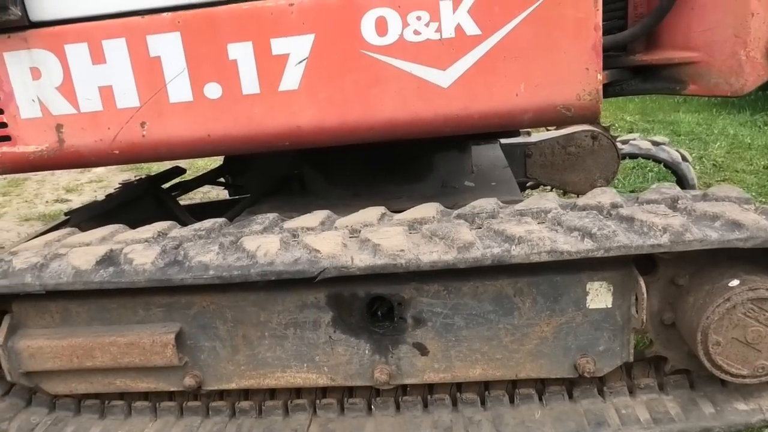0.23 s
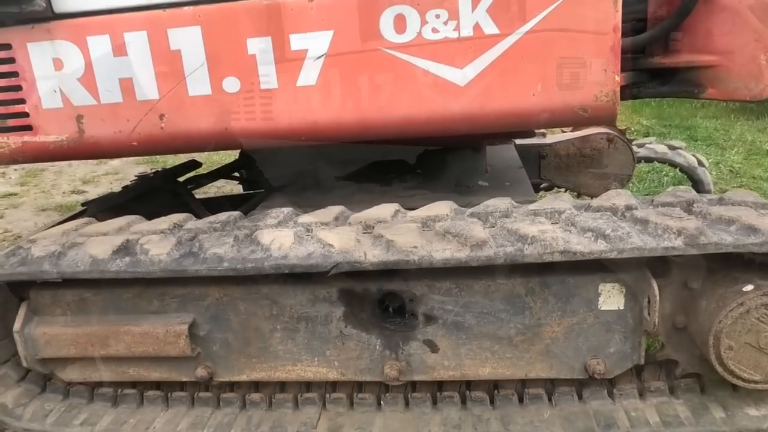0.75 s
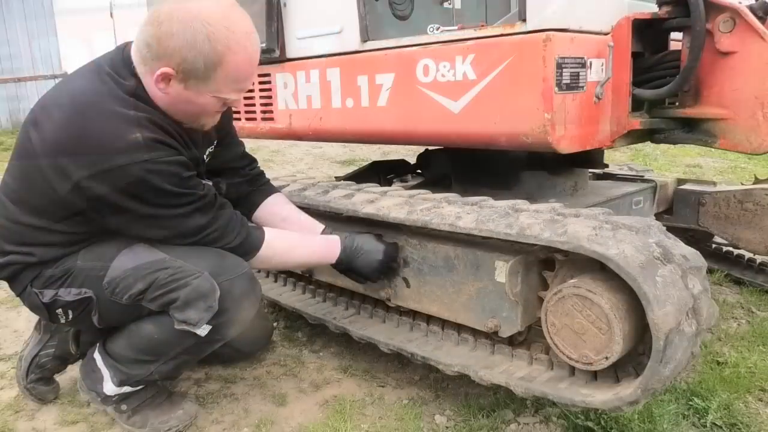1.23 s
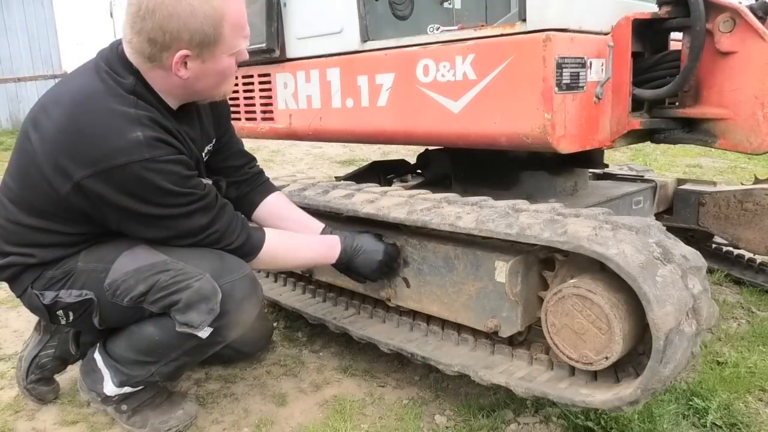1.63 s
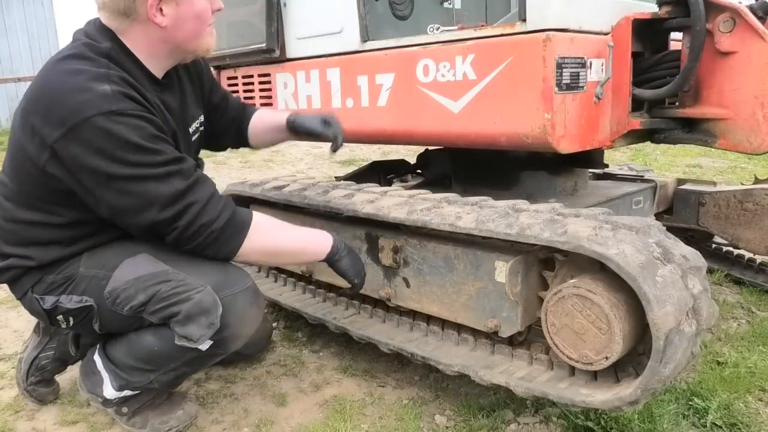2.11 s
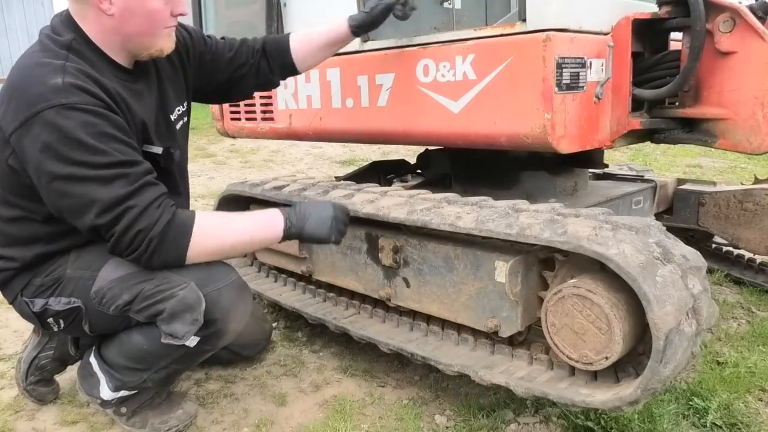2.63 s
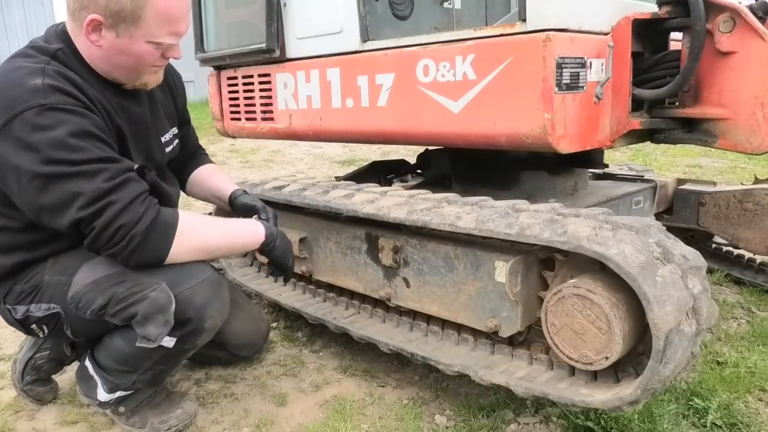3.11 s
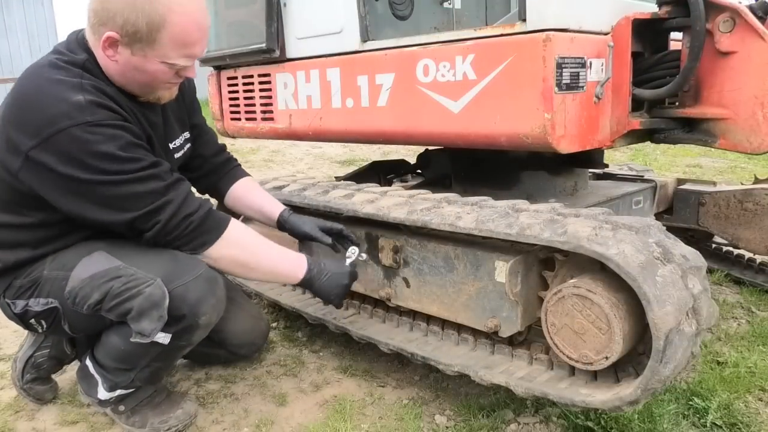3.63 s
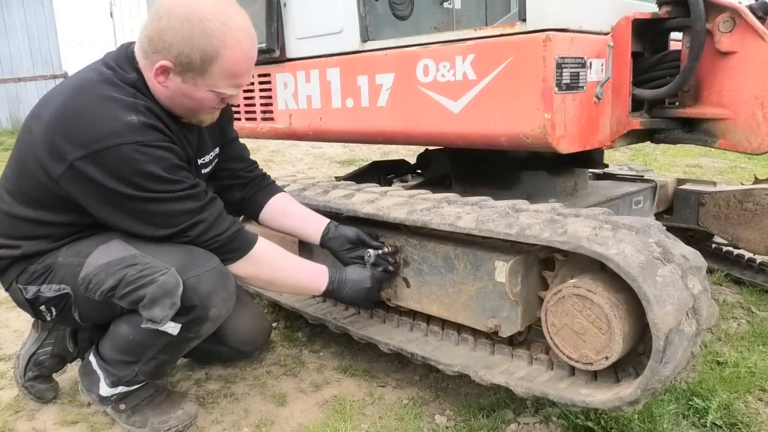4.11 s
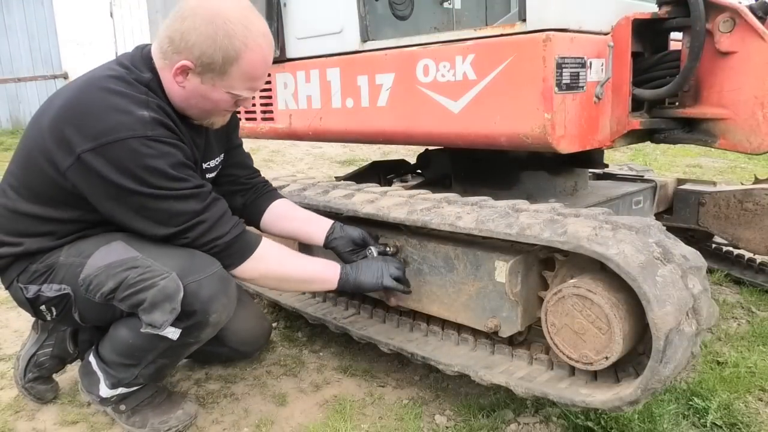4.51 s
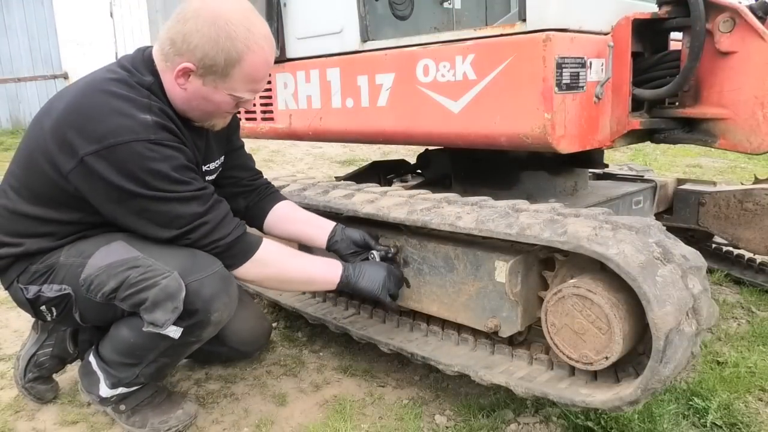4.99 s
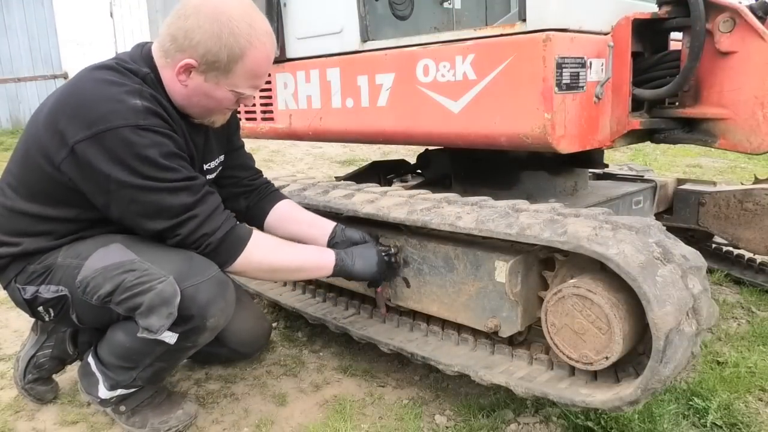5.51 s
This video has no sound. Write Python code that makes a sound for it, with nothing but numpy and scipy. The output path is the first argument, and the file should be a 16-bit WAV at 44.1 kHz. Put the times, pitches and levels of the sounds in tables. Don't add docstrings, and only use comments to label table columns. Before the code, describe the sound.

Clattering diesel idle dissolves into hissy outdoor quiet, where hands rub and tick on steel, a bird whistles, and a tool snaps hard.

```python
import sys
import numpy as np
from scipy import signal
from scipy.fft import rfft, irfft
from scipy.io import wavfile
from scipy.ndimage import uniform_filter1d

SR = 44100
rng = np.random.default_rng(int(sys.argv[2]) if len(sys.argv) > 2 else 0)


def master(y):
    cut = np.clip(np.atleast_2d(y).T, -1, 1)
    pcm = np.round(cut * 32767)
    wavfile.write(sys.argv[1], SR, pcm.astype(np.int16))


def magnitude_from_level(level_db):
    exponent = np.asarray(level_db, float) / 20
    return 10 ** exponent


N = 253575

FIRING_HZ = 36.99
CYLINDER_DB = [-.6, 1.4, 1.2]


def rms_one(x):
    return x / np.sqrt(np.mean(x ** 2) + 1e-20)


def in_time(rows):
    s, *columns = np.transpose(rows)
    return [np.interp(np.arange(N) / SR, s, c) for c in columns]


def coloured(spectrum):
    hz, level_db = np.transpose(spectrum)
    bins = np.arange(1, N // 2 + 2) * SR / N
    gain = magnitude_from_level(np.interp(np.log(bins), np.log(hz), level_db))
    return rms_one(irfft(rfft(rng.standard_normal(N)) * gain, N))


def band(x, low_hz, high_hz):
    return signal.sosfilt(signal.butter(2, [low_hz, min(high_hz, .45 * SR)], "band", fs=SR, output="sos"), x)


def resonance(x, hz, width_hz):
    r = np.exp(-np.pi * width_hz / SR)
    poles = [1, -2 * r * np.cos(2 * np.pi * hz / SR), r * r]
    return signal.lfilter([(1 - r * r) / 2, 0, (r * r - 1) / 2], poles, x)


def drift(rate_hz):
    count = int(N / SR * rate_hz) + 2
    return np.interp(np.linspace(0, count - 1, N), np.arange(count), rng.standard_normal(count))


def add(out, s, sound):
    i = max(round(s * SR), 0)
    out[i:i + len(sound)] += sound[:N - i]


def add_peak(out, s, db, sound):
    add(out, s, magnitude_from_level(db) * sound / np.abs(sound).max())


def puff(noise, t60, build_up_s=0.00012):
    t = np.arange(len(noise)) / SR
    return noise * magnitude_from_level(-60 * t / t60) * (1 - np.exp(-t / build_up_s)) ** 2


def struck(modes, luck, contact_s=.0015):
    t, ring = np.arange(9000) / SR, 0
    for (hz, db, t60), u in zip(modes, luck):
        ring = ring + magnitude_from_level(db + 1.2 * u - 60 * t / t60) * np.sin(2 * np.pi * hz * t)
    ring = ring * (1 - np.exp(-t / contact_s))
    return ring / np.abs(ring).max()


def far_hum():
    # pitch_hz, width_hz, level_db, change_db_per_s
    hum_peaks = [
        (77, 10, -84.5, -1),
        (149, 9, -80.5, -2),
        (945, 300, -90, 2),
    ]
    white, t = rng.standard_normal(N), np.arange(N) / SR - 1.5
    out = np.zeros(N)
    for hz, width_hz, db, slope_db in hum_peaks:
        tone = resonance(resonance(white, hz, width_hz), hz, width_hz)
        out += magnitude_from_level(db + slope_db * t) * rms_one(tone)
    return out


def yard_air():
    # freq_hz, level_db_per_hz
    air_colour = [(8.8, -28.5), (15, 7.5), (31, -3.5), (65, -7.5), (150, -10), (371, -19.5), (512, -19.5),
                  (748, -21.5), (1000, -19), (1600, -24), (7490, -28.5), (14700, -24), (16000, -22.5)]
    sway = uniform_filter1d(drift(21.0), size=2000)
    return magnitude_from_level(-70) * coloured(air_colour) + far_hum() + magnitude_from_level(-65.5) * sway


def bird():
    # start_s, whistles_db, closing_note_after_s, closing_start_hz, closing_db
    phrases = [
        (2.623, -62, .096, 2480, -72),
        (2.775, -66, 0.1, 2600, -70),
        (2.925, -73, .104, 2700, -68),
        (3.084, -81, .105, 3260, -66),
        (3.255, -83.5, 0.1, 3000, -72),
    ]
    # delay_s, length_s, start_hz, end_hz, level_db
    whistles = [
        (0, 0.0096, 4480, 6140, 2.5),
        (.007, .008, 4660, 5940, -1),
        (.033, 0.0063, 5900, 4000, -2),
        (0.037, 0.0093, 5600, 4300, -9),
        (.052, .048, 4050, 4600, -13),
    ]
    closing_s, closing_hz, trill_depth, trill_hz = 0.0207, 3600, 0.5, 190
    out = np.zeros(N)
    for s, whistle_db, gap, from_hz, closing_db in phrases:
        notes = [(s + delay, length, a_hz, b_hz, whistle_db + db) for delay, length, a_hz, b_hz, db in whistles]
        notes.append((s + gap, closing_s, from_hz, closing_hz, closing_db))
        for start, length, start_hz, end_hz, db in notes:
            count = int(length * SR)
            along = np.arange(count) / count
            bend = along ** (.8 if length == closing_s else 1.3)
            glide = np.cumsum(start_hz + (end_hz - start_hz) * bend) / SR
            throat = 1 + trill_depth * (length > .012) * np.cos(2 * np.pi * trill_hz * np.arange(count) / SR)
            shape = np.sin(np.pi * along ** 1.1) ** 2
            add(out, start, magnitude_from_level(db) * shape * throat * np.sin(2 * np.pi * glide))
    return out


def rustle():
    # time_s, effort_db
    effort_curve = [(1.5, 0), (1.82, 1), (2.11, 1), (2.28, 3.5), (2.45, 0.5), (2.7, -5), (3.12, 0.5),
                    (3.45, -2.5), (3.62, 4), (3.8, 1), (4.08, -2), (4.3, -5), (4.49, -0.5), (4.84, -2.5),
                    (5.17, -2.5), (5.32, -3.5), (5.5, -1), (5.75, -2)]
    rub_db, crisp_db, brush_db = -69.5, -71.5, -78.5
    grains = rng.standard_normal((3, N)) * magnitude_from_level(1.4 * np.minimum(rng.exponential(1, (3, N)), 5))
    effort_db, = in_time(effort_curve)
    rub = magnitude_from_level(rub_db + effort_db + 1.2 * drift(45.)) * rms_one(band(grains[0], 2200, 11000))
    crisp = magnitude_from_level(crisp_db + .99 * effort_db + 1.201 * drift(45.)) * rms_one(band(grains[1], 8700, 21000))
    brush = magnitude_from_level(brush_db + effort_db) * rms_one(band(grains[2], 250, 2600))
    return rub + crisp + brush


def strokes():
    # start_s, length_s, low_hz, high_hz,
    # level_db
    drags = [(1.33, .16, 3770, 7900, -60), (1.35, 0.11, 7860, 11500, -58), (1.375, .035, 8500, 11200, -58),
             (1.37, .1, 1580, 1760, -76), (1.385, 0.07, 4150, 4400, -68), (1.585, .04, 5510, 8950, -68),
             (2.14, 0.069, 1500, 4550, -73.5), (2.545, 0.07, 89, 600, -71),
             (3.395, .12, 6800, 11500, -63.5), (3.42, 0.1, 3930, 7000, -66.5),
             (3.485, .035, 4300, 5900, -67), (3.453, .02, 250, 1000, -73), (3.312, 0.02, 5500, 9000, -67.5),
             (3.444, 0.09, 199, 1207, -73.5), (3.463, 0.1, 60.7, 94, -72.5), (3.715, 0.12, 2490, 8960, -72),
             (4.04, .02, 1950, 2250, -69), (4.005, .008, 1100, 1500, -69), (4.125, 0.024, 3400, 5600, -78),
             (4.288, 0.038, 2200, 4200, -75), (4.465, 0.06, 1800, 2700, -77),
             (4.645, .045, 1390, 3200, -73), (4.995, 0.038, 1500, 3400, -74.5),
             (4.232, 0.059, 5960, 9840, -69), (4.549, .067, 2000, 8950, -68.5),
             (5.132, 0.011, 1500, 6500, -59), (5.172, .04, 7000, 10500, -70), (5.645, .04, 860, 980, -76),
             (5.635, .03, 450, 530, -79), (5.45, .03, 800, 960, -76), (5.17, 0.11, 300, 2600, -79),
             (5.22, 0.16, 450, 1400, -77), (5.168, .03, 49.7, 300, -65), (5.43, .075, 1000, 8100, -68),
             (5.63, 0.06, 1990, 7950, -70.5)]
    # start_s, length_s, low_hz, level_db
    wipes = [(1.438, .016, 9000, -62.5), (1.796, .035, 4000, -65), (2.021, 0.036, 5000, -65),
             (2.302, 0.13, 2920, -67), (2.511, .025, 3000, -67), (2.555, 0.035, 3000, -61.5),
             (2.59, 0.042, 8000, -72), (2.75, 0.061, 5000, -66.5), (3.093, 0.052, 4000, -65.5),
             (3.138, 0.11, 4000, -67.5), (3.224, 0.024, 5760, -57.5), (3.37, 0.049, 3870, -64),
             (3.43, .03, 7500, -63), (3.567, .17, 2500, -70), (3.666, 0.031, 5880, -64),
             (4.287, 0.036, 5000, -62), (4.412, 0.017, 3980, -69.5), (4.454, 0.013, 6000, -65),
             (4.512, .016, 5000, -66.5), (4.614, 0.046, 3850, -67.5), (4.918, 0.04, 3520, -64),
             (5.075, 0.021, 3000, -68), (5.627, 0.012, 1500, -63), (5.722, 0.018, 3444, -64)]
    wipe_top_hz = 16030
    rows = [(s, length, hz, wipe_top_hz, db) for s, length, hz, db in wipes] + list(drags)
    out, luck = np.zeros(N), rng.standard_normal((len(rows), 2, 8000))
    for (s, length, low_hz, high_hz, db), (white, grain) in zip(rows, luck):
        count = int(length * SR)
        along = np.arange(count) / count
        roughness = magnitude_from_level(22 * uniform_filter1d(grain, size=90)[:count])
        pressure = np.sin(np.pi * along ** 1.2) ** .8 * roughness
        friction = rms_one(band(band(white, low_hz, high_hz), 0.7 * low_hz, 1.2 * high_hz))
        add(out, s, magnitude_from_level(db) * pressure * friction[:count])
    return out


def ticks():
    # start_s, peak_db, centre_hz, broad_spike_db
    tick_events = [(1.4693, -53, 7000, 5), (1.6244, -57, 11000, -1), (2.576, -52, 7000, -6),
                   (2.591, -49.5, 5800, -2), (2.7924, -53, 7340, -5), (2.9764, -55, 12400, -3.5),
                   (2.9938, -53, 3100, 0), (2.9942, -57, 8200, -6), (3.0, -57, 7900, -12),
                   (3.0328, -55, 7800, 8), (3.051, -60, 9000, -3), (3.0839, -53, 7990, -2),
                   (3.1068, -49.5, 10500, 5), (3.1114, -50, 9000, -3), (3.086, -56, 11500, -6),
                   (3.1255, -54, 9000, -3), (3.1754, -55, 7660, -3), (3.213, -50, 7630, -9.5),
                   (3.2864, -56, 5320, -3), (3.0712, -58, 12600, -12), (3.2656, -59, 7300, -12),
                   (3.3597, -57, 6770, -14), (3.3864, -58, 5800, 2), (3.4205, -47.5, 9300, 4),
                   (3.4503, -45.5, 8750, 3), (3.4506, -48, 5600, -10), (4.0708, -58, 4180, -6),
                   (4.287, -54, 6300, -17), (4.2932, -52, 6200, -9.5), (4.348, -54.5, 5230, -6),
                   (4.349, -59.5, 3500, -9), (4.4994, -57.5, 3820, -4), (4.7446, -56, 13360, 6),
                   (4.8667, -51, 7500, -7), (5.118, -52, 12910, -3), (5.1338, -50, 3500, -2),
                   (5.548, -65.5, 5500, -9), (5.573, -65, 3100, -9), (5.608, -61, 4600, -8.5),
                   (5.628, -54, 6500, 2)]
    out, noise = np.zeros(N), rng.standard_normal((len(tick_events), 2000))
    spike = band(np.arange(200) == 8, 3100, 16500)
    for (s, db, hz, spike_db), white in zip(tick_events, noise):
        add_peak(out, s, db, resonance(puff(white, .012), hz, 0.32 * hz))
        add_peak(out, s, db + spike_db, spike)
    return out


def knocks(blows, modes):
    out, luck = np.zeros(N), rng.standard_normal((len(blows), 9000))
    for (s, db, crack_db, rumble_db), row in zip(blows, luck):
        add(out, s, magnitude_from_level(db) * struck(modes, row, contact_s=.0005))
        add(out, s, magnitude_from_level(db + crack_db) * puff(band(row, 1550, 8000), 0.031))
        rumble = rms_one(band(row[::-1], 170, 1050))
        add(out, s, magnitude_from_level(db + rumble_db) * puff(rumble, 0.1573, 0.012))
    return out


def body_blows():
    # start_s, peak_db, crack_db, dull_rumble_db
    ledge_knocks = [
        (2.5238, -43, -10, -32),
        (2.529, -41, -14, -21),
        (2.547, -58, -10, -14),
        (2.5765, -60, -4, -8),
    ]
    frame_knocks = [
        (4.0165, -39.5, 2, -19.5),
        (4.033, -58, -2, -20),
    ]
    track_thuds = [
        (4.018, -58, -38.5, -17),
        (4.25, -65, -37, -11),
        (5.1772, -44, -31, -18),
        (5.229, -58, -37, -2),
        (5.63, -71, -40, -4),
    ]
    # pitch_hz, level_db, t60_s
    ledge_modes = [(138, -19, 0.16), (400, -18, 0.1), (450, -12, 0.2), (1237, -11, 0.11), (2040, -6, 0.056),
                   (2100, -10, 0.044), (2330, -5, 0.06), (2400, 0, 0.1), (2600, -9, .05), (2780, -7, .03),
                   (3180, -7, 0.066), (3560, -3, 0.07), (3440, -9, .055), (4150, -21, 0.08),
                   (4870, -18, .03)]
    frame_modes = [(1500, -31, 0.037), (1620, 2, 0.033), (1685, -2, 0.04), (1840, -3, 0.044),
                   (1970, -11, .05), (2130, -5, 0.085), (2060, -9, .09), (2400, 1, 0.049),
                   (2250, -3.5, 0.074), (2500, 9.5, 0.026), (2980, -8.5, 0.057), (3270, -17, 0.018),
                   (3660, 6, 0.013), (4320, -5, 0.035)]
    track_modes = [(149, 2, 0.042), (494, 1, 0.069), (600, 16.5, 0.025), (926, 11, 0.022), (1320, 9, 0.016)]
    return knocks(ledge_knocks, ledge_modes) + knocks(frame_knocks, frame_modes) + knocks(track_thuds, track_modes)


def snaps():
    # start_s, peak_db, centre_hz, fitting_ring_db, t60_s
    slips = [(4.0191, -40, 12800, -42, 0.012), (5.1419, -36, 9000, -32, .01),
             (5.1432, -29.5, 8800, -35, .015), (5.153, -30, 8500, -35, .014), (5.164, -36, 8350, -30, .008),
             (5.1648, -28, 8350, -19, .016), (5.1696, -26, 8000, -16.5, 0.022),
             (5.2187, -36, 6950, -35, 0.003), (5.2206, -30, 8800, -26, 0.014),
             (5.4265, -38.5, 8940, -37.5, 0.0079), (5.4298, -32, 7020, -29, .016),
             (5.581, -42, 7990, -30, .016), (5.5838, -36, 7000, -30, 0.02), (5.6275, -59, 5700, -5, .008)]
    # centre_hz, width_hz, level_db
    spanner_colour = [(11000, 8600, -7), (5000, 2100, -7.5), (14950, 2100, -11)]
    # pitch_hz, level_db, t60_s
    fitting_modes = [(1634, 11, 0.032), (1737, 8, 0.052), (2380, 2, 0.05), (1980, 5, 0.033),
                     (2530, 6.5, 0.041), (3000, 9.5, 0.012)]
    # start_s, peak_db
    jaw_clicks = [
        (4.0199, -36),
        (5.143, -19.5),
        (5.1646, -25),
        (5.1696, -32),
        (5.2207, -34),
        (5.431, -34),
        (5.585, -35),
    ]
    out, luck = np.zeros(N), rng.standard_normal((len(slips), 3000))
    for (s, db, hz, ring_db, t60), white in zip(slips, luck):
        burst = puff(white, t60, 0.00036)
        snap = 2 * resonance(burst, hz, 800)
        for centre_hz, width_hz, gain_db in spanner_colour:
            snap = snap + magnitude_from_level(gain_db) * resonance(burst, centre_hz, width_hz)
        snap = signal.sosfilt(signal.butter(2, 0.84 * hz, "high", fs=SR, output="sos"), snap)
        add_peak(out, s, db, snap)
        add(out, s + 0.0025, magnitude_from_level(db + ring_db) * struck(fitting_modes, white[-len(fitting_modes):]))
    click = band(np.arange(200) == 8, 9000, 16000)
    for s, db in jaw_clicks:
        add_peak(out, s, db, click)
    return out


def wavering(turn, db, wander, blur=1):
    phase = wander * drift(11.0) + blur * rng.uniform(-np.pi, np.pi)
    return magnitude_from_level(db + 2.2 * drift(9.6)) * np.sin(turn + phase)


def cycle_whine():
    # pitch_hz, level_db
    cycle_tones = [(641, -27), (776, -24), (974.2, -19), (1195.5, -33), (1319, -29), (1738.5, -29),
                   (1960, -33), (2109.5, -25.5), (3095, -32.5)]
    turn = 2 * np.pi * np.arange(N) / SR
    return sum(wavering(hz * turn, db, .7) for hz, db in cycle_tones) * np.sqrt(2)


def looseness(order, db):
    # into_cycle_s, first_order, last_order, blur (1 = no swell)
    swell_groups = [(.009, 8, 18, .6), (.046, 21, 30, .3), (.039, 36, 45, .4)]
    steady_wander, loose_wander, loose_below_db = .5, 1.5, -9.2
    if order < 7:
        return 0, steady_wander / 2, 1
    wander = loose_wander if db < loose_below_db else steady_wander
    for s, first, last, blur in swell_groups:
        if first <= order <= last:
            return s, wander, blur
    return 0, wander, 1


def exhaust():
    # multiple_of_cycle, level_db
    orders = [(3, -11), (5, -18), (6, -5), (8, -8), (9, -5.5), (10, -5.5), (11, -14), (12, -2.5),
              (13, -9.5), (14, -9), (15, -12), (16, -12), (17, -4), (18, -8), (21, -2.5), (22, -9),
              (23, -5.5), (24, -6), (25, -8.5), (26, 0.5), (27, -10), (28, -12), (29, -4), (30, -4),
              (31, -13), (34, -15), (36, -14), (37, -11), (38, -13), (39, -4.5), (40, -12), (42, -9),
              (43, -13), (44, -11), (45, -13), (47, -14)]
    out, cycle_hz = 0, FIRING_HZ / len(CYLINDER_DB)
    for order, db in orders:
        s, wander, blur = looseness(order, db)
        turn = 2 * np.pi * order * cycle_hz * (np.arange(N) / SR - s)
        out = out + wavering(turn, db, wander, blur)
    return rms_one(out)


def combustion_knock(firings):
    # pitch_hz, level_db, t60_s
    block_modes = [(1330, -2, .02), (1740, 4, .028), (1930, 6.5, .027), (2450, -4, .025), (3090, -5, .025),
                   (3480, -2, .06), (3950, -5, .02), (6000, -14, .008)]
    strike_place = [(3, 3, -8, -6, -6, -2, -6, -8), (-4, -6, 2, 3, 4, 0, -2, 2),
                    (-4, -2, 1, -5, -6, 1, 4, 1)]
    knock_db, delay_s = -6, (0.0032, .002, .0022)
    scatter, jitter_s = 2.2, .00005
    out, luck = np.zeros(N), rng.standard_normal((len(firings), len(block_modes) + 1))
    for k, (s, row) in enumerate(zip(firings, luck)):
        cylinder = k % len(CYLINDER_DB)
        modes = [(hz, db + extra_db, t60) for (hz, db, t60), extra_db in zip(block_modes, strike_place[cylinder])]
        start = s + delay_s[cylinder] + jitter_s * row[-1]
        add(out, start, magnitude_from_level(knock_db + CYLINDER_DB[cylinder]) * struck(modes, scatter * row))
    return out


def swell(times, sizes, hold, fall):
    out, t = np.zeros(N), np.arange(3000) / SR
    shape = (1 - np.exp(-t / 0.00052)) * np.exp(-np.maximum(t - hold, 0) / fall)
    for s, size in zip(times, sizes):
        add(out, s, size * shape)
    return out


def firing_clatter(firings):
    # freq_hz, level_db_per_hz
    roar_colour = [(29, -47), (50, -7), (145, -4), (234, -8.5), (321, -4), (398, -8.5), (472, -6.5),
                   (678, -8.5), (997, -10.5), (1540, -16), (1780, -12.5), (2620, -21), (3500, -20.5),
                   (8340, -34), (16000, -54)]
    # low_hz, high_hz, delay_s, hold_s, fall_s, burst_db, valve_tick_db, share_repeated_every_cycle (0-1)
    clatter_bands = [(90, 250, .004, .004, .004, -20, -20, .1), (250, 400, .004, .004, .004, -20, -20, .25),
                     (400, 600, .005, .004, .003, -4, -20, .15), (600, 1000, .004, .004, .004, -8, -12, .6),
                     (1000, 1600, .003, .0045, .001, 2, -10, .85),
                     (1600, 2500, .0022, .004, .003, 8.5, -3, .7),
                     (2500, 4400, .0012, .0095, .0065, 12.5, -1, .55),
                     (4400, 7500, -.0006, .003, .01, 7, 2, .25),
                     (7500, 17000, .0008, .0065, .003, 8, -2, .35)]
    # centre_hz, width_hz, depth (up to 1, negative for a peak)
    hollows = [(51, 30, 1), (86, 12, .85), (135, 10, .6), (625, 60, .3), (1100, 90, .6), (1545, 110, .25),
               (2060, 70, .6), (2240, 180, .3), (2440, 80, -.4), (2880, 100, -.3), (3260, 140, .4),
               (3490, 140, -.6), (3660, 60, .25), (3900, 150, -.5), (5100, 200, .5), (5500, 500, .3),
               (6100, 300, -.4), (8300, 400, -.6)]
    valve_delay_s, spread_db = .0172, .8
    valve_by_cylinder_db, sharp_by_cylinder_db, sharp_above_hz = [1, -5, 2], [-3, 0, 0], 4000
    count = len(firings)
    cycle = np.arange(N) % round(len(CYLINDER_DB) * SR / FIRING_HZ)
    clatter, shared = 0, rng.standard_normal((count, 2))
    for low_hz, high_hz, delay, hold, fall, burst_db, valve_db, share in clatter_bands:
        roar = band(coloured(roar_colour), low_hz, high_hz)
        pattern = roar[-SR:][:cycle.max() + 1]
        pattern = pattern * roar.std() / np.sqrt(uniform_filter1d(pattern ** 2, size=400, mode="wrap"))
        roar = np.sqrt(1 - share) * roar + np.sqrt(share) * pattern[cycle]
        spread = magnitude_from_level(spread_db * (shared + 1.3 * rng.standard_normal(shared.shape)))
        sharp_db = np.multiply(sharp_by_cylinder_db, low_hz > sharp_above_hz)
        bursts = magnitude_from_level(burst_db + np.resize(CYLINDER_DB + sharp_db, count)) * spread[:, 0]
        valves = magnitude_from_level(valve_db + np.resize(valve_by_cylinder_db, count)) * spread[:, 1]
        flare = 1 + swell(firings + delay, bursts, hold, fall)
        flare += swell(firings + valve_delay_s, valves, .001, .004)
        flare /= np.sqrt(np.mean(flare[:SR] ** 2))
        clatter = clatter + flare * roar
    for hz, width_hz, depth in hollows:
        clatter = clatter - depth * resonance(clatter, hz, width_hz)
    return clatter


def engine():
    # time_s, level_db
    fader = [
        (0.0, -20.5),
        (0.318, -20.5),
        (0.764, -20),
        (1.06, -24.5),
        (1.278, -34),
        (1.356, -43),
        (1.4, -62),
    ]
    firings = .003 + np.arange(56) / FIRING_HZ
    level_db, = in_time(list(fader) + [(1.41, -120)])
    motor = magnitude_from_level(-4.5) * exhaust() + magnitude_from_level(-4) * firing_clatter(firings)
    return magnitude_from_level(level_db) * (motor + cycle_whine() + combustion_knock(firings))


def scene():
    fade_in, = in_time([(.8, 0.012), (1.4, 0.75)])
    yard = fade_in * (yard_air() + rustle())
    work = ticks() + body_blows() + bird()
    snap = snaps()
    echo = band(np.roll(work + snap, round(0.014 * SR)), 300, 4300)
    steady = engine() + yard + strokes() + work + magnitude_from_level(-17.5) * echo
    top = signal.ellip(14, .5, 80, 15900, fs=SR, output="sos")
    return (signal.sosfilt(top, steady) + snap)[None]


def low_pass(x):
    return signal.sosfilt(signal.butter(12, 16820, fs=SR, output="sos"), x)


def record(dry):
    rounded = 0.75 * np.tanh(dry / 0.72)
    top_cut = signal.cheby2(10, 60, 17201, fs=SR, output="sos")
    return low_pass(signal.sosfilt(top_cut, rounded))


dry = scene()
out = record(dry)
master(out)
```